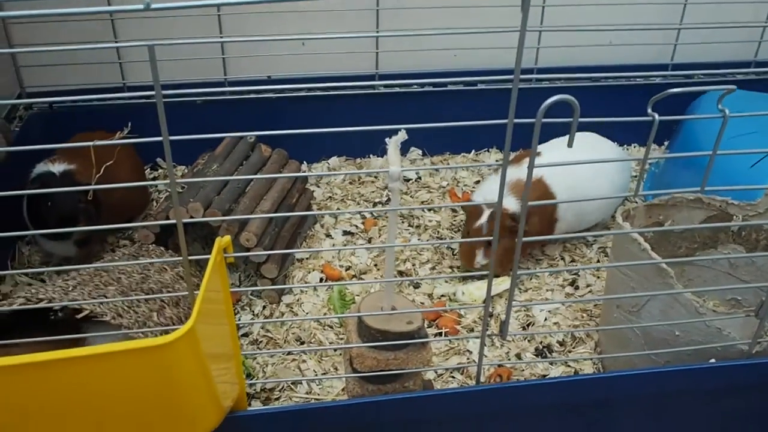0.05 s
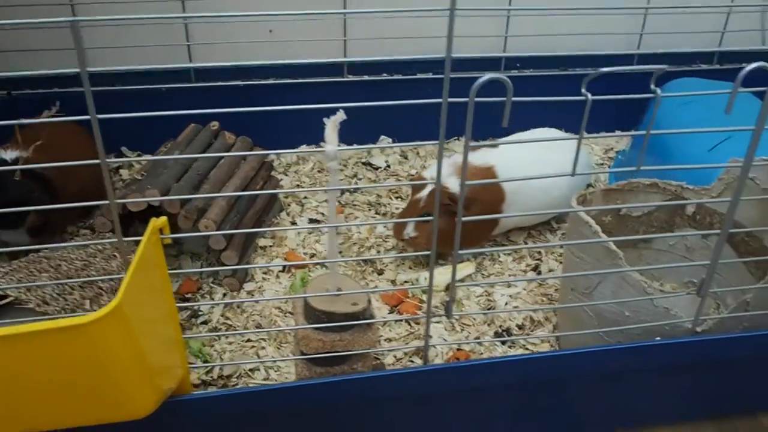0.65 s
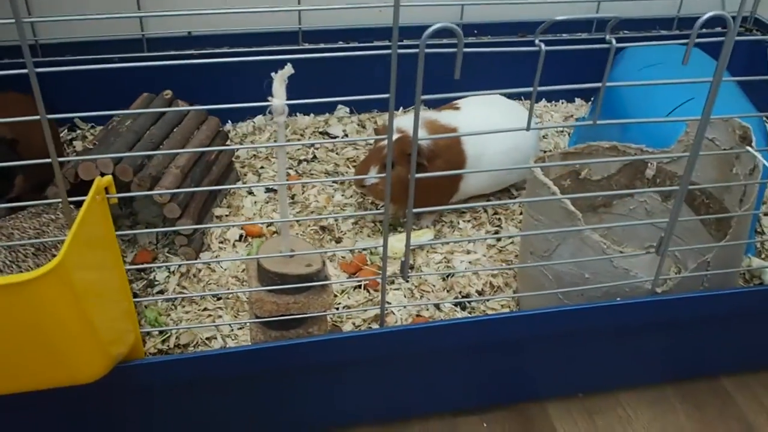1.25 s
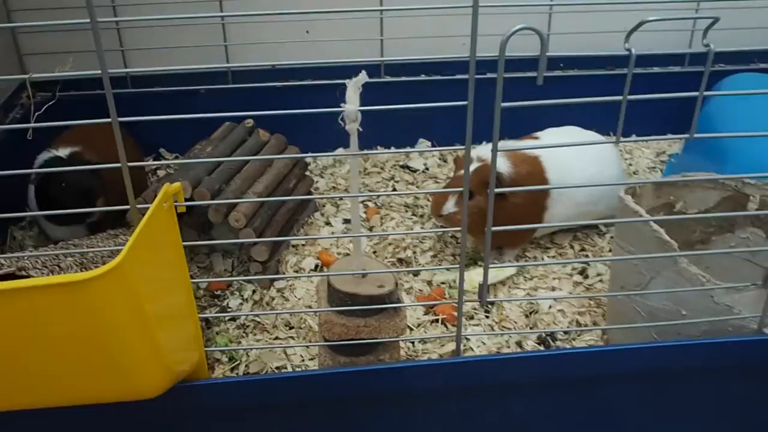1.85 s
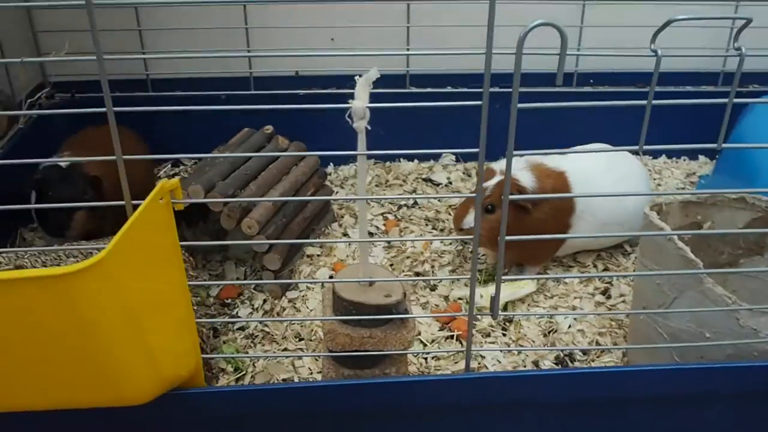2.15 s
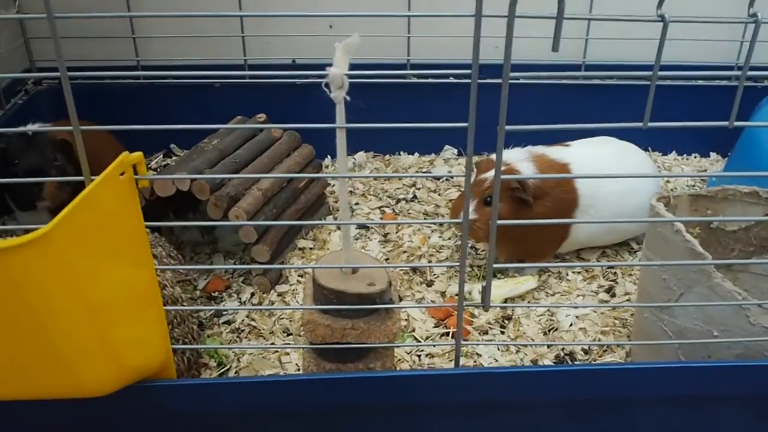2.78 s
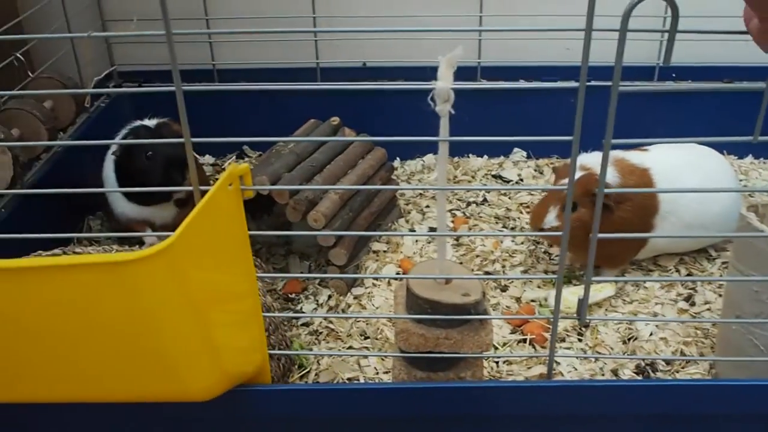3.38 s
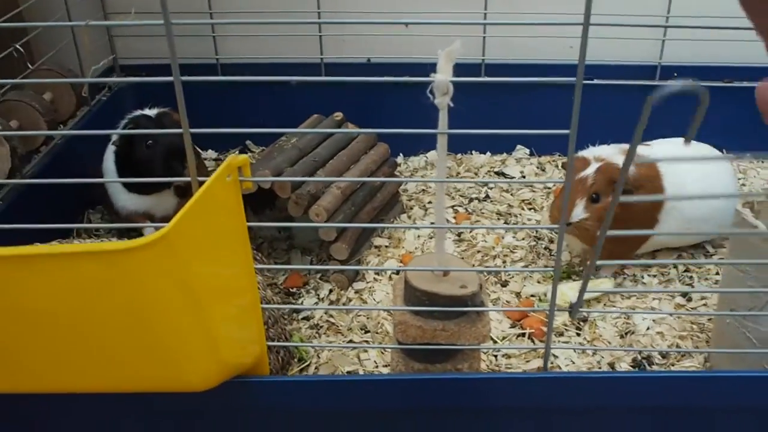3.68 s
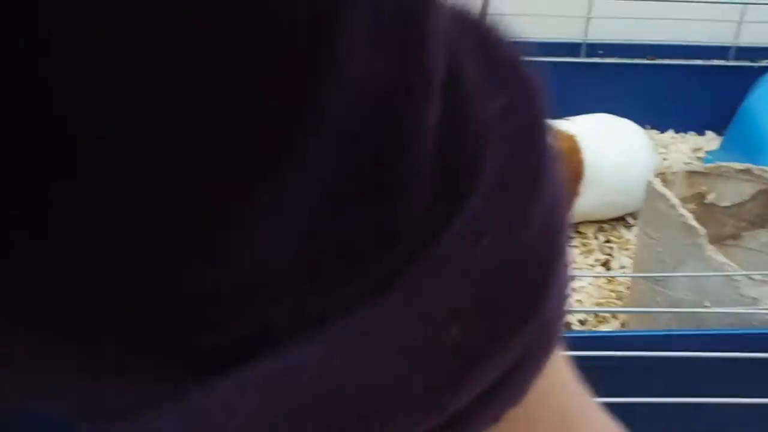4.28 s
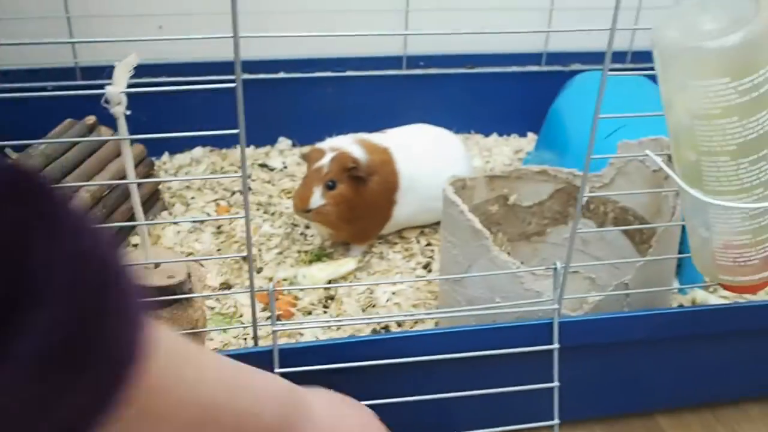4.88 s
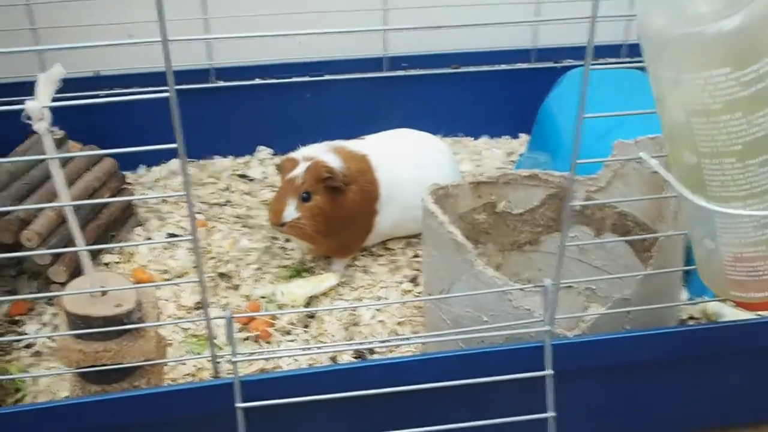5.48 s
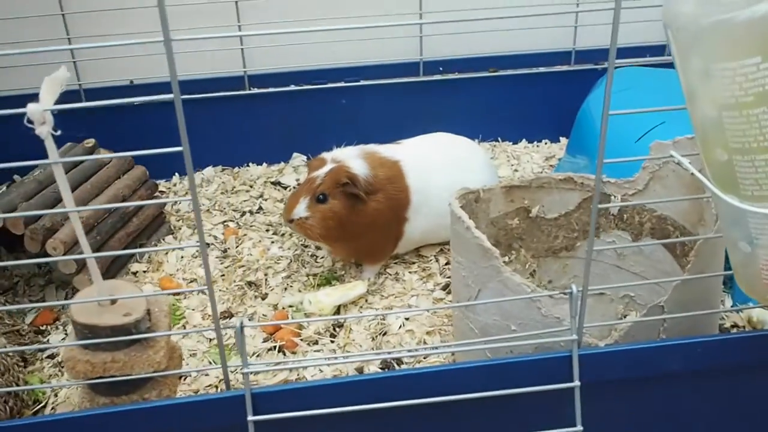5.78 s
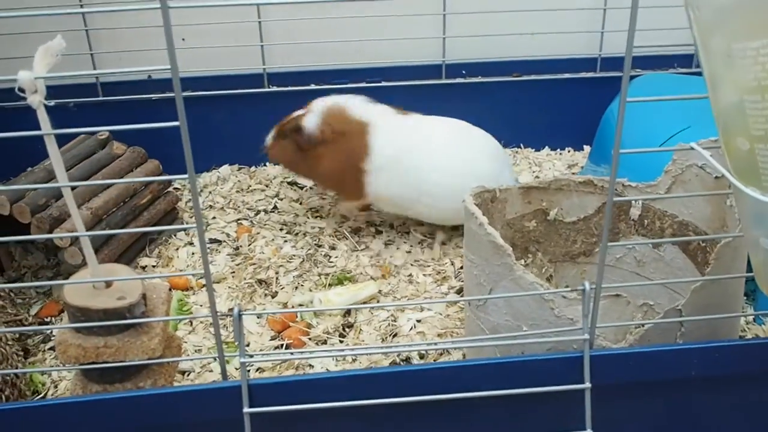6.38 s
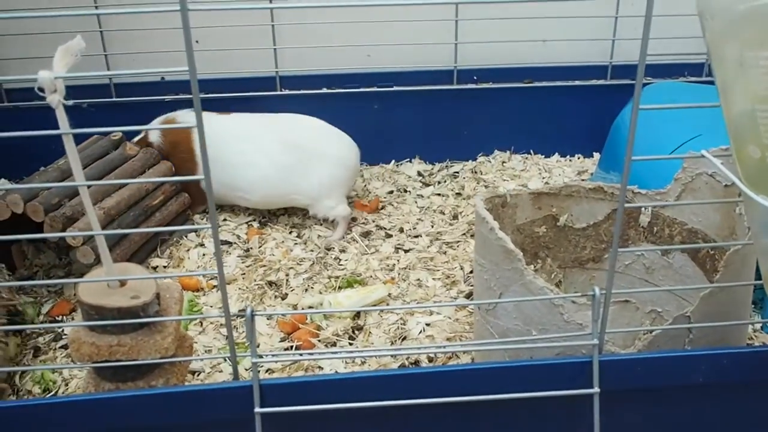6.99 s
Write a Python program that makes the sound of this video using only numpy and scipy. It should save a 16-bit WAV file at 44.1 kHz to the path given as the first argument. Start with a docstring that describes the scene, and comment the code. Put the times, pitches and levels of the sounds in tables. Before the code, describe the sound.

Pellets rattle in fast, even strokes inside a crinkly, hollow-sounding packet held close by. In the pause that follows, a guinea pig whimpers quietly in short upward slides and stirs its bedding. Its cage creaks and knocks, then the wire door falls open with a metallic jangle and a low plastic boom. After a faint swish of cloth the packet is shaken again, drawing a single brief squeal. The room is small and quiet.

```python
"""In a small quiet room a packet of dry feed is shaken close by, about nine strokes a second: pellets
strike its resonant wall and the wrapper buckles. From 2 s a guinea pig answers with short rising
whimpers as shavings crackle under its paws. From 3 s a hand works on its cage; the wire door slips off
its catch and at 4.6 s drops against the plastic tub, exciting the modes of both. A sleeve brushes
past, the packet is grabbed at 5.2 s and shaken again, and at 6.9 s it draws one high squeal."""
import sys
import numpy as np
from scipy import signal
from scipy.fft import rfft, irfft, next_fast_len
from scipy.io import wavfile
from scipy.ndimage import uniform_filter1d

SR = 44100
rng = np.random.default_rng(int(sys.argv[2]) if len(sys.argv) > 2 else 0)


def materialize(psi):
    """Save the field psi as 16-bit PCM at rate SR to the path in sys.argv[1].

    A 1-D psi becomes a single channel; in a 2-D psi each row is a channel.
    """
    bounded = np.clip(np.atleast_2d(psi).T, -1, 1)
    quanta = np.round(bounded * 32767).astype(np.int16)
    wavfile.write(sys.argv[1], SR, quanta)


N = 314874
T = np.arange(N) / SR

# likeness of the diffuse field at the two microphones: frequency_hz, coherence
COHERENCE = [(30, 0.68), (1000, 0.97), (3000, 0.86), (8000, 0.057)]
# reverberation of the room: frequency_hz, t60_s
ROOM_DECAY = [(150, 0.63), (600, 0.36), (4000, 0.41), (14000, 0.37)]
# noise of the room at rest: frequency_hz, density_db
AMBIENT_SPECTRUM = [(12, -8), (20, -20), (74, -3.5), (123, -11), (198, -5.5), (337, -15), (590, -10.5),
                    (1400, -24.5), (1760, -17.5), (2390, -23), (3250, -20), (5380, -27.5), (9400, -26.5),
                    (14700, -41.5), (16000, -43)]
# drift of its hiss: time_s, gain_db
HISS_DRIFT = [(2.2, 0.5), (2.9, 0), (3.2, -3.5), (4.0, 1.5), (4.6, -2.5), (4.9, 0)]

# strokes of the packet: crest_s, level_db, length_s
STROKES = [(0.036, -28.5, 0.053), (0.133, -25, 0.054), (0.238, -29, 0.058), (0.36, -25.5, 0.057),
           (0.48, -26.5, 0.047), (0.574, -24.5, 0.047), (0.692, -27, 0.06), (0.813, -25, 0.058),
           (0.931, -27, 0.066), (1.039, -25.5, 0.051), (1.155, -29, 0.069), (1.263, -25, 0.054),
           (1.373, -28.5, 0.048), (1.486, -27, 0.062), (1.602, -32, 0.083), (1.705, -30.5, 0.059),
           (1.786, -31.5, 0.022), (1.885, -31.5, 0.087), (5.603, -35, 0.04), (5.706, -30.5, 0.11),
           (5.796, -24, 0.031), (5.845, -26, 0.062), (5.898, -19, 0.025), (6.004, -24.5, 0.052),
           (6.103, -22, 0.046), (6.204, -26.5, 0.054), (6.288, -24, 0.042), (6.388, -30, 0.066),
           (6.47, -25.5, 0.032), (6.569, -29, 0.093), (6.662, -22, 0.037), (6.754, -25.5, 0.061),
           (6.839, -21.5, 0.041), (6.943, -26, 0.032), (7.021, -29, 0.063)]
# the hand grabs the packet: crest_s, level_db, length_s
GRABS = [(5.218, -43, .05), (5.262, -41.5, 0.039), (5.319, -39.5, 0.022), (5.372, -37.5, 0.034),
         (5.449, -40.5, 0.055)]
# where the packet is held: time_s, left_lead_us, left_over_right_db, treble_db
PACKET_POSITION = [(0, 21, .7, -1), (1.2, 21, .6, .5), (1.8, 20, .5, 5), (5.2, 44, 1.0, -1),
                   (6.2, 45, 1.1, -9), (7.1, 45, 1.2, -9)]
# the grip on the packet: time_s, ring_db, tightness (0 to 1)
GRIP = [(1.0, -0.06, 0), (1.8, -2, 0.83), (5.7, -2, 0.45), (5.9, 0.3, 0.88), (7, 0.3, .92)]
# hollow modes of the packet: frequency_hz, loose_db, tight_db, t60_s
PACKET_MODES = [(485, -3, -3, 0.052), (520.4, -6, 2, 0.07), (582, -5, 0.5, 0.056), (642, 1.5, -15.5, 0.043),
                (730, 0, -3, 0.0089), (740, 0, -5, 0.06), (868, -9.5, -5.5, 0.051), (940, 0.5, -13, 0.035),
                (1032, -4.5, -7.5, 0.052), (1288, -12, -10.5, 0.056), (1560, -5.5, -29, 0.042),
                (1825, -6.5, -6, 0.02)]
# one pellet striking the packet: frequency_hz, density_db
PELLET_SPECTRUM = [(100, -21), (350, -7), (550, -18.5), (1150, -3.5), (1800, 2), (2350, -2.5), (3100, -.5),
                   (4100, 0.5), (5300, -5), (8300, -3.5), (10500, -8.5), (13000, -19), (16000, -26)]
# colour that the wrapper adds to a tick: frequency_hz, gain_db
WRAPPER_RESPONSE = [(500, -13.5), (3000, -7), (8000, 2), (13000, 1.5)]
# loudest snaps of the wrapper: start_s, level_db, pitch_hz
SNAPS = [(0.0536, -10, 1660), (.0824, -16, 4130), (0.142, -12, 6870), (0.1848, -14, 2200),
         (.2164, -10.5, 3970), (.25, -15, 1630), (0.2826, -10.5, 1860), (0.4922, -10.5, 2800),
         (.556, -13, 3210), (0.6016, -6, 4270), (0.706, -16, 1560), (0.761, -20, 4060), (0.845, -11, 1600),
         (.8894, -10, 2060), (0.932, -8.5, 4130), (.9584, -13.5, 4230), (1.004, -4.5, 4150),
         (1.022, -6, 3320), (1.045, -11, 1800), (1.0603, -15, 1720), (1.07, -11, 4340), (1.1117, -19, 2120),
         (1.2759, -9.5, 3380), (1.44, -15.5, 3300), (1.4674, -8, 3400), (1.4717, -7, 4830),
         (1.884, -12, 4120), (1.9016, -13.5, 1850), (1.926, -25, 3320), (5.318, -24.5, 4500),
         (5.3497, -15.5, 4100), (5.375, -16, 1650), (5.446, -21.5, 1650), (5.533, -24.5, 1690),
         (5.6505, -12.5, 4500), (5.6593, -9.5, 7500), (5.6937, -9, 3730), (5.703, -11, 4110),
         (5.7107, -8.5, 4300), (5.718, -4, 4420), (5.7726, -11.5, 1770), (5.9068, -6, 3960),
         (5.923, -18, 1700), (6.022, -7, 1660), (6.066, -6, 4000), (6.096, -4.5, 4190), (6.1079, -9, 4130),
         (6.2145, -8, 1880), (6.276, -5.5, 3580), (6.296, -5.5, 3300), (6.446, -11, 2660),
         (6.663, -12, 1920), (6.863, -4.5, 4000), (6.997, -10, 3560), (7.02, -13, 1730), (7.0435, -8, 4160),
         (7.105, -19, 1830)]
# clumps of feed hitting the wall: start_s, level_db
THUMPS = [(.136, -15), (.249, -15.5), (.387, -15), (.44, -18), (.556, -14.5), (.706, -17), (.795, -16.5),
          (.812, -18.5), (.864, -13.5), (.904, -18), (.983, -18), (1.035, -17), (1.052, -20), (1.272, -19),
          (1.362, -23.5), (1.497, -22.5), (1.957, -14.5), (2.355, -35), (2.393, -36), (5.259, -22),
          (5.283, -25.5), (5.783, -18.5), (5.82, -18), (5.858, -17.5), (5.899, -16), (5.985, -18),
          (6.006, -16), (6.124, -16.5), (6.17, -17.5), (6.206, -16.5), (6.29, -22), (6.411, -16.5),
          (6.482, -17.5), (6.56, -19), (6.59, -15), (6.66, -12), (6.74, -19), (6.765, -17), (6.805, -20),
          (6.849, -12.5), (6.935, -20), (7.043, -22.5)]

# whimpers: start_s, hold_s, slide_s, hold_hz, top_hz, lateness_exponent, leap_hz,
# hold_db, early_slide_db, top_db, overtones_db
WHIMPERS = [(2.004, 0.047, 0.071, 661, 1776, 0.69, 0, -44, -46, -39, -4),
            (2.113, 0.056, 0.075, 668, 1657, 0.84, 298, -46, -45, -47.5, -2),
            (2.268, 0.047, 0.11, 667, 1758, 0.57, 258, -45.5, -41.5, -35.5, 0.5),
            (2.593, 0.065, 0.042, 675, 1330, 0.99, -3, -44.5, -43.5, -41, 1.5),
            (2.725, .045, 0.051, 628, 1190, 0.83, 0, -44.5, -44, -52, -8),
            (2.966, 0.047, 0.033, 645, 967, 0.95, 0, -46, -44, -45, -2),
            (3.289, 0.065, 0.07, 620, 1530, 1.56, 0, -45.5, -41, -58, -5)]
# harmonics of the voice, from the fundamental up: level_db
HARMONICS = [-2.5, -6.5, -13, -22, -34]
# resonance of the throat near 3 kHz: frequency_hz, gain_db
THROAT_FORMANT = [(2400, 1), (3100, 4), (4300, -9)]
# paws in the wood shavings: crest_s, level_db, length_s
PAW_STEPS = [(2.031, -44.5, 0.0084), (2.071, -52, 0.012), (2.266, -48.5, 0.033), (2.389, -44.5, 0.046),
             (2.559, -48, 0.027), (2.656, -50.5, 0.025), (3.336, -46.5, 0.014)]
# single shavings cracking: start_s, peak_db, pitch_hz
SHAVING_CRACKS = [(2.0352, -32, 4000), (2.0638, -31, 3800), (2.356, -30, 4200), (2.583, -30, 3010)]

# rumble of the tub under the hand: time_s, level_db
TUB_STRAIN = [(3.03, -65), (3.1, -48), (3.33, -60), (3.375, -43), (3.6, -43), (3.9, -46), (4.3, -58.5),
              (4.62, -59), (4.76, -52), (5.3, -57)]
# modes of the plastic tub: frequency_hz, level_db, t60_s
TUB_MODES = [(92.5, -15, .09), (120, -9, 0.08), (150, -9, 0.065), (167.5, -0.5, 0.12), (211, -7, 0.048),
             (250, -3.5, 0.071), (358, -16, 0.062), (463, -10.5, 0.089), (573, -8.5, 0.068)]
# blows of door and hand on the cage: start_s, jangle_db, boom_db
BLOWS = [(3.072, -44, -44), (3.793, -33.5, -44), (3.806, -29.5, -34), (4.315, -40, -41),
         (4.640, -24.5, -26), (4.648, -21.5, -24), (4.721, -31, -21.5), (4.735, -44, -23.5),
         (4.866, -45, -35), (5.259, -48, -33)]
# dense jangle of the whole grid: frequency_hz, density_db
JANGLE_SPECTRUM = [(100, -9), (350, 3), (550, 7), (950, 4.5), (1250, -1), (2000, -1.5), (2900, -2),
                   (3700, -1.5), (5000, -13), (9000, -12), (12000, -19), (16000, -42)]
# modes of the wire door: frequency_hz, level_db, t60_s
DOOR_MODES = [(465, 14, 0.11), (620, -2, 0.29), (885, -9, 0.21), (1320, 8.5, 0.14), (1600, 11, 0.16),
              (1860, 8, 0.13), (2030, 1, 0.23), (2420, 6, 0.3), (2600, -4, 0.57), (3300, 4, 0.22),
              (3300, -13, .22), (3700, -10, .15), (4000, 5, 0.15), (3800, -15, 0.4), (4770, 0, .15)]
# high modes of single bars: frequency_hz, level_db, t60_s
BAR_MODES = [(4670, -6, 0.34), (6400, -1, 0.31), (6800, -7, .5), (7500, 2, 0.073), (8330, -16, .3),
             (9450, -8, .3), (11300, -3, .25), (13500, -19, .2), (14600, -16, .2)]
# the wire top knocks on the rim of the tub: start_s, peak_db
TOP_KNOCKS = [(3.088, -40), (3.425, -38), (3.566, -24.5), (3.622, -37), (3.658, -33.5), (3.823, -31.5),
              (3.851, -31), (4.318, -40), (4.642, -22), (4.664, -29), (4.722, -28.5)]
# modes of the wire top: frequency_hz, level_db, t60_s
TOP_MODES = [(458, -0.5, 0.17), (484, -2, 0.15), (601, 0, 0.18), (700, -2.5, 0.086), (960, -2, 0.086),
             (1430, -9, .12), (1700, -11, 0.089), (1990, -9, 0.09)]
# the door buzzing against the bars: frequency_hz, density_db
BUZZ_SPECTRUM = [(300, -18), (900, -9), (1800, -9), (2600, 1), (3600, 7), (4200, 2.5), (4700, -5),
                 (5200, -2), (6000, -20), (16000, -45)]
# modes of the door's short wires: frequency_hz, level_db, t60_s
SHORT_WIRE_MODES = [(2000, -11, .07), (2180, -7, .06), (2380, -8, .07), (2570, -7, .12), (2990, -9, .06),
                    (3170, -3, 0.067), (3370, -6, .05), (3499, -2, .06), (3770, -1, .05), (3920, -2, .055),
                    (4910, -13, .045)]
# single bars springing back: start_s, level_db
BAR_PINGS = [(3.742, -45.5), (3.822, -49), (4.717, -37.5), (4.786, -35), (4.896, -37)]
# the fallen door chatters: start_s, peak_db, rattle_s
DOOR_CHATTER = [(4.644, -25, .018), (4.673, -17.5, 0.007), (4.718, -26, 0.0036), (4.730, -25, 0.0037),
                (4.750, -19.5, .012), (4.797, -23.5, .006), (4.849, -40, .008)]


def amp(db):
    """Amplitude grows tenfold for every 20 decibels."""
    return 10 ** (np.asarray(db) / 20)


def unit_rms(x):
    """Normalisation to unit mean power."""
    return x / np.sqrt(np.mean(x ** 2) + 1e-20)


def unit_peak(x):
    """Normalisation to unit peak amplitude."""
    return x / abs(x).max()


def at_frequency(points, hz):
    """Interpolation along a logarithmic frequency axis."""
    known_hz, value = np.transpose(points)
    return np.interp(np.log(hz + 1), np.log(known_hz + 1), value)


def add(mix, start_s, sound):
    """Superposition: a sound sums into the mix from start_s on."""
    part = mix[..., round(start_s * SR):][..., :sound.shape[-1]]
    part += sound[..., :part.shape[-1]]


def through(x, response):
    """A linear system convolves its input with its impulse response."""
    return signal.fftconvolve(x, response)[:len(x)]


def colour(points, size=2048):
    """Minimum phase: a magnitude spectrum determines a causal impulse response."""
    log_gain = np.log(amp(at_frequency(points, abs(np.fft.fftfreq(size, 1 / SR)))))
    return np.fft.ifft(np.exp(np.conj(signal.hilbert(log_gain)))).real


def low_cut(x, hz):
    """A third-order high-pass attenuates what lies below hz."""
    return signal.sosfilt(signal.butter(3, hz, "high", fs=SR, output="sos"), x)


def slow_noise(shape, span):
    """A moving average over span samples leaves the slow fluctuations of white noise."""
    return unit_rms(uniform_filter1d(rng.standard_normal(shape), span))


def ring(modes, spread_db=0., detune=0., size=32768):
    """Free vibration is a sum of damped modes; each point of impact weights them differently."""
    t = T[:size]
    draws = rng.standard_normal((len(modes), 3))
    out = np.zeros(size)
    for (hz, db, t60), (weight, shift, polarity) in zip(modes, draws):
        envelope = amp(db + spread_db * weight - 60 * t / t60)
        out += np.sign(polarity) * envelope * np.sin(2 * np.pi * hz * (1 + detune * shift) * t)
    return out


def impacts(size, per_s, spread_db):
    """Shot noise: independent impulses, many small and a few large."""
    strength = amp(spread_db * np.minimum(rng.exponential(1, size), 4)) * rng.choice([-1, 1], size)
    return strength * (rng.random(size) < per_s / SR)


def rattle(length_s):
    """Repeated contact: one impulse, then a quick dying run of smaller ones."""
    t = T[:2048]
    return (t == 0) + .5 * impacts(len(t), per_s=1500, spread_db=1) * np.exp(-(t / length_s) ** 2)


def swell(t, crest_s, db, length_s, rise_share):
    """Amplitude envelope of a movement that grows for a share of its length, then fades."""
    away = np.maximum((crest_s - t) / rise_share, (t - crest_s) / (1 - rise_share)) / length_s
    return amp(db) * np.exp(-.5 * away ** 1.63)


def diffuse(a, b):
    """A diffuse field is partly coherent at two close microphones; two unrelated signals form it."""
    coherence = at_frequency(COHERENCE, np.fft.rfftfreq(len(a), 1 / SR))
    mid = rfft(a) * np.sqrt((1 + coherence) / 2)
    side = rfft(b) * np.sqrt((1 - coherence) / 2)
    return irfft([mid + side, mid - side], len(a))


def place(x, lead_us, left_db, early_db):
    """Differences of arrival time and level give direction; small things nearby scatter the treble."""
    size = next_fast_len(len(x) + 2048)
    hz, t = np.fft.rfftfreq(size, 1 / SR), T[:1024]
    early = diffuse(*(rng.standard_normal((2, len(t))) * np.exp(-t / .002) * (t > .0004)))
    scatter = amp(early_db) * rfft(early / np.linalg.norm(early[0]), size) * hz / np.hypot(hz, 1500)
    lead_s = lead_us / 10 ** 6 * hz / np.hypot(hz, 3840)  # low frequencies arrive nearly in step
    delay = np.exp(-2j * np.pi * hz * lead_s)
    direct = np.array([amp(left_db / 2) * np.ones_like(delay), amp(-left_db / 2) * delay])
    return irfft(rfft(x, size) * (direct + scatter), size)[:, :len(x)]


def room(x, wet_db):
    """Reverberation: a diffuse tail builds up, then decays exponentially in each band."""
    hz, t, spectra = signal.stft(rng.standard_normal((2, SR // 2)), SR, nperseg=256)
    decay = amp(-60 * t / at_frequency(ROOM_DECAY, hz)[:, None])
    build_up = 1 - np.exp(-t / 0.014)
    tail = diffuse(*signal.istft(spectra * decay * build_up, SR, nperseg=256)[1])
    return x + amp(wet_db) * signal.fftconvolve(x, tail / np.linalg.norm(tail[0]), axes=1)[:, :N]


def ambient_noise():
    """The noise floor: a diffuse broadband field whose hiss drifts, over a narrowband drone."""
    response = colour(AMBIENT_SPECTRUM, size=16384)
    air = unit_rms(diffuse(*(through(rng.standard_normal(N), response) for _ in range(2))))
    hiss = signal.sosfiltfilt(signal.butter(2, 400, "high", fs=SR, output="sos"), air)
    air += hiss * (amp(np.interp(T, *np.transpose(HISS_DRIFT))) - 1)
    drone = through(rng.standard_normal(N), ring([(71.0, 0, 0.2)]))
    return amp(-50) * air + amp(-55.5) * unit_rms(drone)


def in_hand(sound, s):
    """A moving source: the paths from the packet to the microphones depend on the time s."""
    when, *columns = np.transpose(PACKET_POSITION)
    lead_us, left_db, treble_db = (np.interp(s, when, column) for column in columns)
    sound = through(sound, colour([(10000, 0), (13000, treble_db)], size=256))
    return place(sound, lead_us + 3 * rng.standard_normal(), left_db, early_db=-4.5)


def crease(hz, rise_s=0.00018):
    """Buckling releases a transient: a broadband crack and a few cycles at the crease's own pitch."""
    t = T[:2048]
    burst = t / rise_s * np.exp(-t / rise_s)
    crack = through(burst * rng.standard_normal(len(t)), colour(PELLET_SPECTRUM, size=512))
    crack = through(crack, colour(WRAPPER_RESPONSE, size=256))
    tone = burst * np.sin(2 * np.pi * hz * t)
    return unit_peak(unit_peak(crack) + amp(-0.5) * unit_peak(tone))


def packet_wall(s):
    """Impulse response of the wall as gripped at time s; so small a radiator gives little bass."""
    when, _, tightness = np.transpose(GRIP)
    tight = np.interp(s, when, tightness)
    modes = [(hz, loose_db + tight * (tight_db - loose_db), t60)
             for hz, loose_db, tight_db, t60 in PACKET_MODES]
    knock = ring(modes, spread_db=1.8, detune=.012, size=4096)
    return low_cut(low_cut(knock, hz=380), hz=380)


def packet_strokes(moves, rise_share):
    """Impact excitation: each movement throws pellets at the wall, which rings under their crackle."""
    out, pellet = np.zeros((2, N)), colour(PELLET_SPECTRUM, size=1024)
    when, ring_db, _ = np.transpose(GRIP)
    flex_limit_db, lag_s, linger_s = -34.5, 0.0014, 0.011  # rolling pellets keep the wall going
    for s, db, length_s in moves:
        t = np.arange(max(s - .17, 0), s + .17, 1 / SR)
        wall_db = min(db - 6.5, flex_limit_db) + np.interp(s, when, ring_db)
        wall_level = swell(t, s + lag_s, wall_db, length_s + linger_s, rise_share)
        crackle_level = swell(t, s, db - 5, length_s, rise_share)
        pellets_per_s = 950 * amp(db + 26)  # a harder stroke throws more pellets
        for patch in range(3):  # each patch of the wall has its own paths to the microphones
            pellets = through(impacts(len(t), pellets_per_s, spread_db=4.2), pellet)
            ticks = through(impacts(len(t), per_s=90, spread_db=2.2), crease(rng.uniform(2500, 8500)))
            crackle = unit_rms(pellets) + amp(-6.5) * unit_rms(ticks)
            wall = unit_rms(through(impacts(len(t), per_s=250, spread_db=2.0), packet_wall(s)))
            add(out, t[0], in_hand(crackle * crackle_level + wall * wall_level, s))
    return out


def wrapper_snaps(fade_s=0.0077):
    """Buckling in cascade: each loud snap leaves a short flurry of smaller creases."""
    out, tick = np.zeros((2, N)), colour(PELLET_SPECTRUM, size=1024)
    t = T[:2048]
    for s, db, hz in SNAPS:
        flurry = unit_rms(through(impacts(len(t), per_s=2500, spread_db=2), tick)) * np.exp(-t / fade_s)
        add(out, s, in_hand(amp(db - 0.5) * (crease(hz) + amp(-19) * flurry), s))
    return out


def feed_thumps():
    """The impulses of a clump land within milliseconds and drive the wall's modes as one thump."""
    out = np.zeros((2, N))
    for s, db in THUMPS:
        thump = unit_peak(through(packet_wall(s), rattle(length_s=.005)))
        add(out, s, in_hand(amp(db - 0.5) * thump, s))
    return out


def feed_settling(crest_s=1.985):
    """As the shaking stops, small impacts of settling feed keep the wall in resonance."""
    out = np.zeros((2, N))
    t = crest_s + np.arange(-.05, .25, 1 / SR)
    hum = unit_rms(through(impacts(len(t), per_s=600, spread_db=1), packet_wall(crest_s)))
    add(out, t[0], in_hand(hum * swell(t, crest_s, db=-42, length_s=0.05, rise_share=0.28), crest_s))
    return out


def voice(pitch_hz, overtones_db, edge_s):
    """Harmonic source and throat filter; a climbing voice flutters, rasps and loses even harmonics."""
    flutter_db, odd_fade_db, even_fade_db, rasp_db = 2.0, -2.5, -17, 3  # per octave of climb
    size = len(pitch_hz)
    jitter, rasp = slow_noise((2, SR // 4), span=70)[:, :size]
    shimmer = slow_noise((len(HARMONICS), SR // 4), span=450)[:, :size]
    octaves = np.maximum(np.log2(pitch_hz / pitch_hz[0]), 0)
    phase = 2 * np.pi * np.cumsum(pitch_hz * (1 + (.016 + .02 * octaves) * jitter)) / SR
    tone = amp(HARMONICS[0] + flutter_db * octaves * shimmer[0]) * np.sin(phase)
    for k in range(2, len(HARMONICS) + 1):
        fade_db = octaves * (odd_fade_db if k % 2 else even_fade_db)
        source_db = HARMONICS[k - 1] + overtones_db + fade_db + 2 * shimmer[k - 1]
        tone += amp(source_db + at_frequency(THROAT_FORMANT, k * pitch_hz)) * np.sin(k * phase)
    hoarseness = 1 + amp(-14 + rasp_db * octaves) * rasp
    return np.sqrt(2) * tone * hoarseness * signal.windows.tukey(size, 2 * edge_s * SR / size)


def whimpers():
    """Frequency glides: each call holds a low, sagging note, falters, slides up and levels off."""
    out = np.zeros(N)
    sag_share, leap_at_share = 0.054, 0.56
    falter_s, falter_delay_s = 0.011, 0.0046
    for s, hold_s, slide_s, hold_hz, top_hz, lateness, leap_hz, *levels_db, overtones_db in WHIMPERS:
        t = np.arange(0, hold_s + slide_s, 1 / SR)
        progress = np.clip((t - hold_s) / slide_s, 0, 1)
        glide_hz = (top_hz - hold_hz - leap_hz) * np.sin(np.pi / 2 * progress ** lateness) ** 2
        low_hz = hold_hz * (1 - sag_share * np.sin(np.pi * np.minimum(t / hold_s, 1)))
        pitch_hz = low_hz + glide_hz + leap_hz * (progress > leap_at_share)
        db = np.interp(t, [hold_s, hold_s + falter_s, hold_s + slide_s], levels_db)
        falter_db = -7.5 * np.exp(-((t - hold_s - falter_delay_s) / falter_s) ** 2)
        add(out, s, amp(db + falter_db) * voice(pitch_hz, overtones_db, edge_s=0.008))
    return out


def tub_echoes(x, count):
    """Early reflections from the walls of the tub smear the voice."""
    taps = signal.unit_impulse(2048)
    delays = (SR * rng.uniform(.003, .022, count)).astype(int)
    taps[delays] += amp(-9) * rng.choice([-1, 1], count) / np.sqrt(count)
    return through(x, taps / np.linalg.norm(taps))


def dry_rustle():
    """Dense tiny impacts merge into broadband noise, for shavings and cloth alike."""
    tick = colour([(200, 0.5), (700, 3.5), (2500, 1.5), (4500, 3.0), (9000, 3.0), (14000, -11)])
    return unit_rms(through(impacts(N, per_s=1100, spread_db=3.5), tick))


def paws(rustle):
    """Each step modulates the rustle of the shavings; single ones crack in sharp transients."""
    out = rustle * sum(swell(T, *step, rise_share=0.32) for step in PAW_STEPS)
    for s, db, hz in SHAVING_CRACKS:
        add(out, s, amp(db) * crease(hz))
    return out


def chirp(length_s=0.074, from_hz=5000, to_hz=3440):
    """Noise modulation widens a falling tone into a breathy band."""
    pitch_hz = np.linspace(from_hz, to_hz, round(length_s * SR))
    breath = slow_noise(SR, span=50)[:len(pitch_hz)]
    tone = np.sin(2 * np.pi * np.cumsum(pitch_hz) / SR)
    return unit_rms(breath * tone * np.hanning(len(tone)))


def tub_rumble():
    """Forced vibration: small slips under the hand drive the low modes of the tub."""
    s, db = np.transpose(TUB_STRAIN)
    slips = impacts(N, per_s=140, spread_db=2.2)
    level = amp(np.interp(T, s, db, left=-120, right=-120))
    return unit_rms(through(slips, ring(TUB_MODES[2:7]))) * level


def on_cage(sound):
    """Scattering differs for every point of impact on the cage."""
    return place(sound, lead_us=-33.0, left_db=-1.0, early_db=-2.0)


def blow(jangle_db, boom_db):
    """An impact spreads through the grid, whose dense modes jangle, and the tub, whose low ones boom."""
    boom = unit_peak(ring(TUB_MODES, spread_db=0.5, detune=0.023))
    t = T[:len(boom)]
    double_decay = amp(-60 * t / 0.16) + amp(-16.5 - 60 * t / 2.15)
    jangle = unit_peak(through(rng.standard_normal(len(t)) * double_decay, colour(JANGLE_SPECTRUM)))
    jangle += amp(-7) * unit_peak(ring(DOOR_MODES, spread_db=4, detune=0.012))
    attack = 1 - np.exp(-t / 0.00045)
    return (amp(jangle_db) * jangle + amp(boom_db + 3) * boom) * attack


def bar_ping(db):
    """The high inharmonic modes of one bar outlast a bright splash of noise."""
    bar = unit_peak(ring(BAR_MODES, spread_db=1, detune=.003))
    t = T[:len(bar)]
    burst = rng.standard_normal(len(t)) * amp(-60 * t / 0.067)
    splash = through(burst, colour([(2000, -13.0), (5000, -12.0), (8500, -6.5), (15000, -19.5)]))
    return amp(db) * (amp(-5.5) * bar + amp(10) * unit_peak(splash))


def top_knock(db):
    """Repeated contact with the rim of the tub excites the modes of the wire top."""
    response = ring(TOP_MODES, spread_db=2.5, detune=0.0097)
    return amp(db) * unit_peak(through(response, rattle(length_s=0.0052)))


def tub_groan(length_s=.19, from_hz=265, to_hz=163, sink_s=.06):
    """A rough oscillation of the tub wall sinks in frequency as the wall gives under the hand."""
    t = T[:round(length_s * SR)]
    wobble, grit = slow_noise((2, SR), span=500)[:, :len(t)]
    pitch_hz = to_hz + (from_hz - to_hz) * np.exp(-(t / sink_s) ** 2)
    phase = 2 * np.pi * np.cumsum(pitch_hz * (1 + .06 * wobble)) / SR
    return unit_rms(np.sin(phase) * (1 + .3 * grit) * signal.windows.tukey(len(t), .25))


def door_catch(start_s=3.526, slips=11, gap_s=.0108, release_s=3.582):
    """Stick-slip friction: the catch jerks along its wire, hardest midway, and springs free."""
    out = np.zeros((2, N))
    for k in range(slips):
        arch = np.sin(np.pi * k / (slips - 1))
        s = start_s + gap_s * (k + arch * rng.uniform(-.5, .5))
        db = -35 + 8 * arch
        slip = blow(jangle_db=db, boom_db=db - 3.5) + bar_ping(db - 9)
        add(slip, 0, door_clack(db=-31.5 + 7 * arch, rattle_s=0.0084))
        add(out, s, on_cage(slip))
    add(out, release_s, on_cage(bar_ping(db=-32)))
    return out


def door_clack(db, rattle_s):
    """Intermittent contact: the door buzzes against the bars, and its short wires ring on."""
    contacts = np.pad(rattle(rattle_s), (0, 8192))
    wires = unit_peak(through(contacts, ring(SHORT_WIRE_MODES, spread_db=2.5, detune=.006)))
    buzz = unit_peak(through(contacts, colour(BUZZ_SPECTRUM)))
    return amp(db) * unit_peak(buzz + amp(-3.5) * wires)


def cage():
    """Structure-borne sound: grid and tub radiate as the door is unhooked, falls and chatters."""
    out = tub_rumble() + door_catch()
    for s, jangle_db, boom_db in BLOWS:
        add(out, s, on_cage(blow(jangle_db, boom_db) + bar_ping(jangle_db - 19.5)))
    for s, db, rattle_s in DOOR_CHATTER:
        add(out, s, on_cage(door_clack(db, rattle_s)))
    for s, db in TOP_KNOCKS:
        add(out, s, on_cage(top_knock(db)))
    for s, db in BAR_PINGS:
        add(out, s, on_cage(bar_ping(db) + blow(jangle_db=db - 2, boom_db=db - 2)))
    add(out, 3.355, on_cage(amp(-40) * tub_groan()))
    thin_wire = ring([(4380, 0, .2)], size=8192)  # the fingers take hold
    add(out, 3.33, on_cage(amp(-50) * unit_peak(thin_wire)))
    dull_tick = ring([(905, -1, 0.014), (1330, 2, 0.01), (1700, -11, .012)], size=2048)
    add(out, 4.476, on_cage(amp(-34.5) * unit_peak(dull_tick)))  # the hand lowers the door
    return out


def sleeve(rustle):
    """Friction noise swells and fades as the sleeve of the withdrawing hand brushes past."""
    return rustle * swell(T, crest_s=5.0, db=-48, length_s=0.23, rise_share=0.34)


def squeal(length_s=.029, start_hz=2770, rise=0.073):
    """Weak overtones leave a nearly pure tone on one short arch of pitch."""
    arch = np.sin(np.linspace(0, 2.4, round(length_s * SR)))
    return voice(start_hz * (1 + rise * arch), overtones_db=-18, edge_s=0.0037)


def scene():
    """The sources superpose in one room: the packet close by, the cage a step away."""
    calls = whimpers()
    add(calls, 6.910, amp(-28.5) * squeal())
    add(calls, 2.53, amp(-53) * chirp())
    calls = tub_echoes(calls, count=6)
    rustle = dry_rustle()
    in_tub = place(calls + paws(rustle) + sleeve(rustle), lead_us=0, left_db=0, early_db=-8)
    door = low_cut(cage(), hz=68.6)
    packet = packet_strokes(STROKES, rise_share=0.49) + packet_strokes(GRABS, rise_share=0.18)
    packet += wrapper_snaps() + feed_thumps() + feed_settling()
    return room(packet, wet_db=-14) + room(in_tub, wet_db=-9.5) + room(door, wet_db=-14) + ambient_noise()


def record(dry):
    """Soft saturation rounds the highest peaks; a steep low-pass then limits the band."""
    excess = np.maximum(abs(dry) - .5, 0)
    rounded = dry - np.sign(dry) * (excess - .3 * np.tanh(excess / .3))
    low_pass = signal.firwin(511, 15950, window=("kaiser", 9), fs=SR)
    return signal.oaconvolve(rounded, low_pass[None], "same")


dry = scene()
out = record(dry)
materialize(out)
```